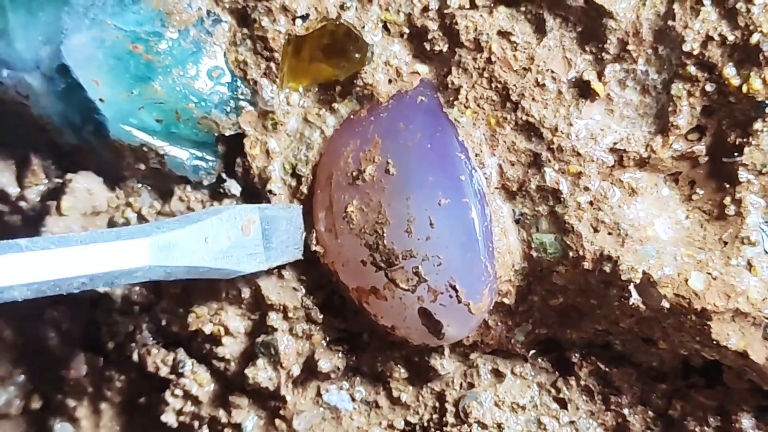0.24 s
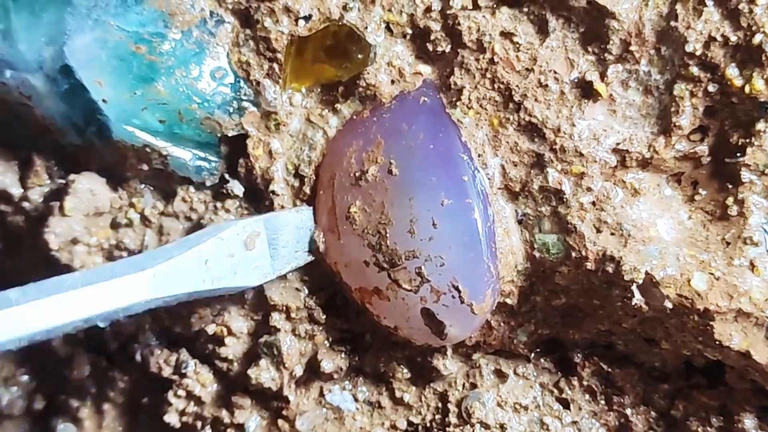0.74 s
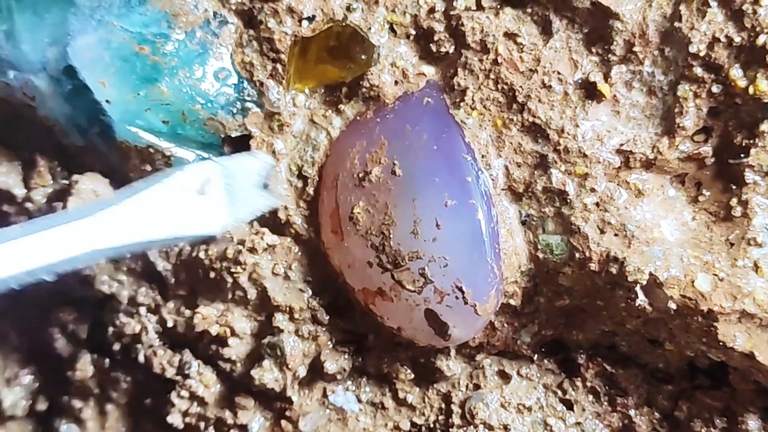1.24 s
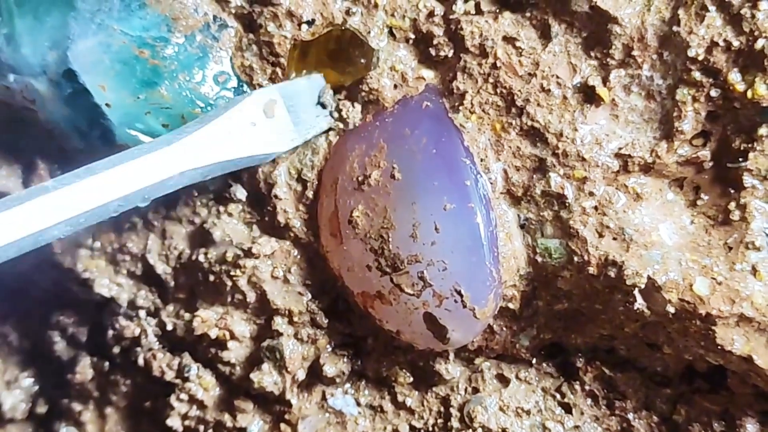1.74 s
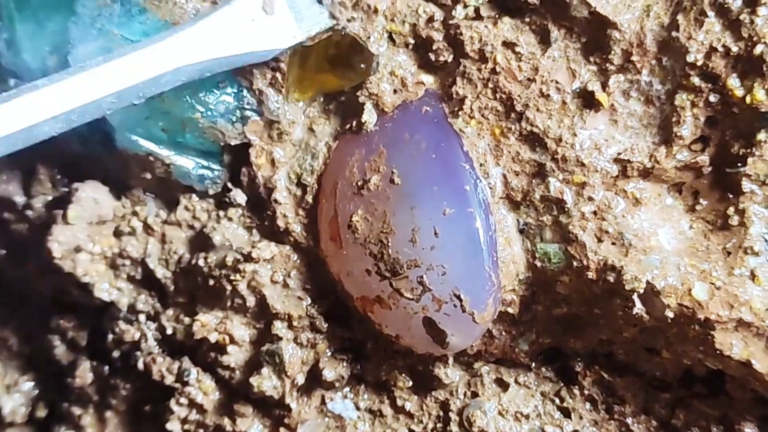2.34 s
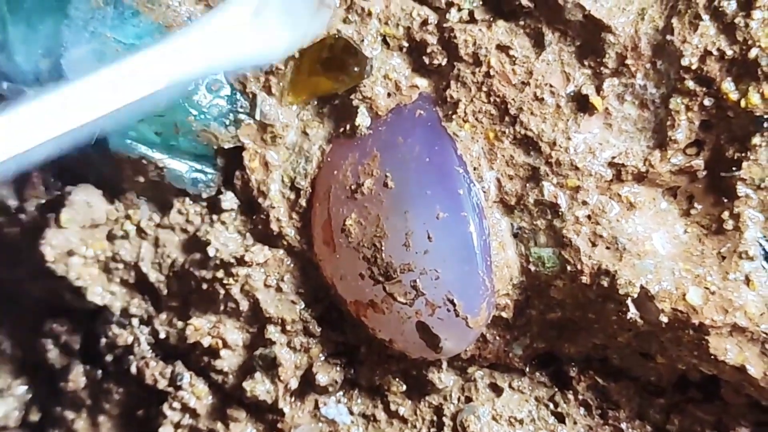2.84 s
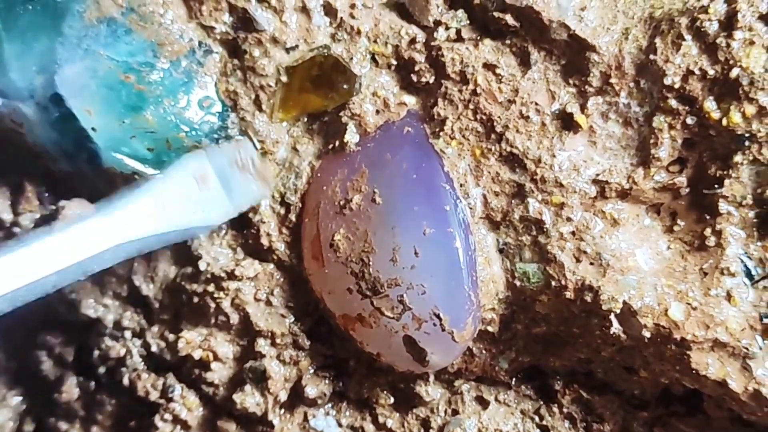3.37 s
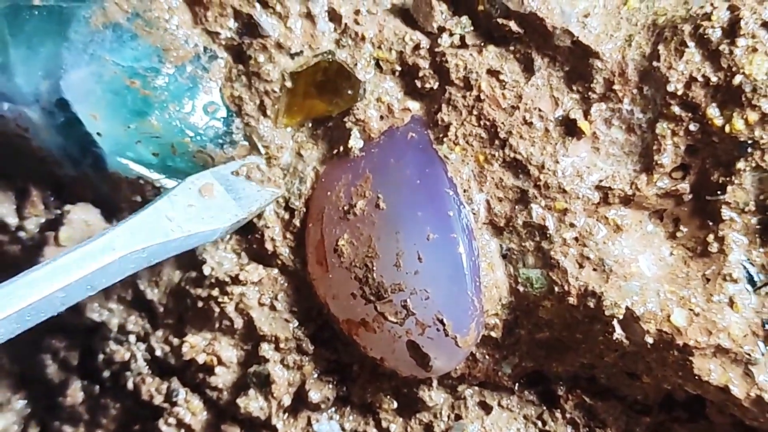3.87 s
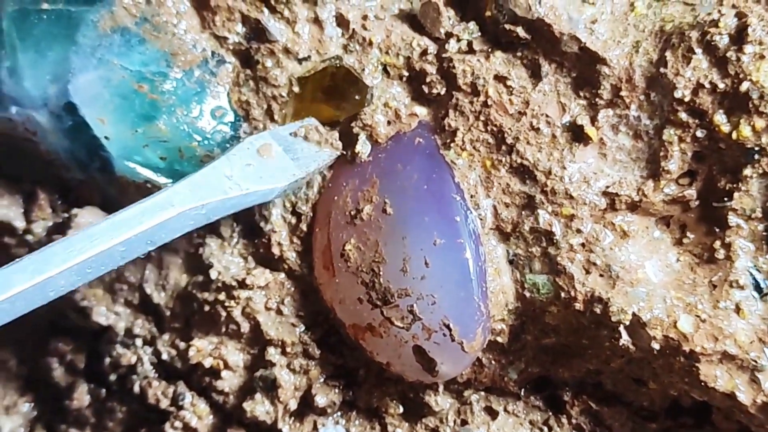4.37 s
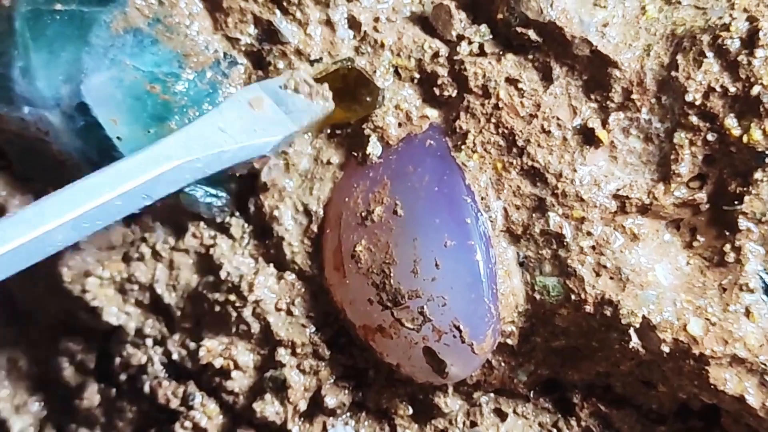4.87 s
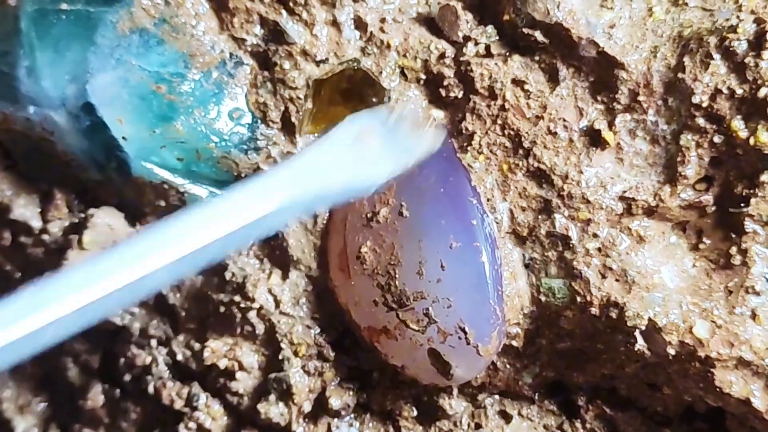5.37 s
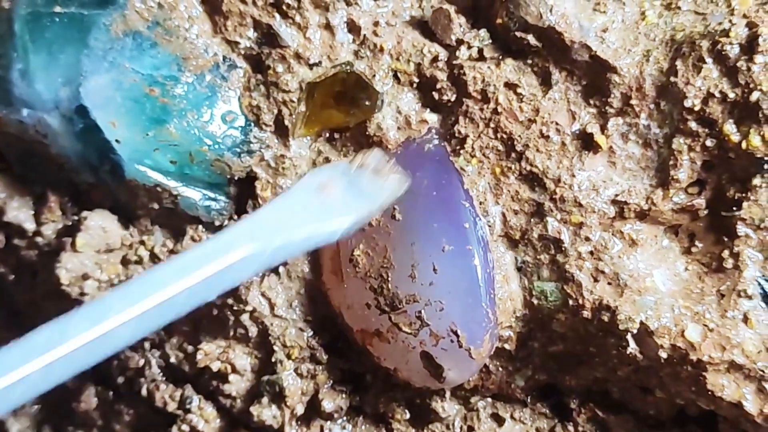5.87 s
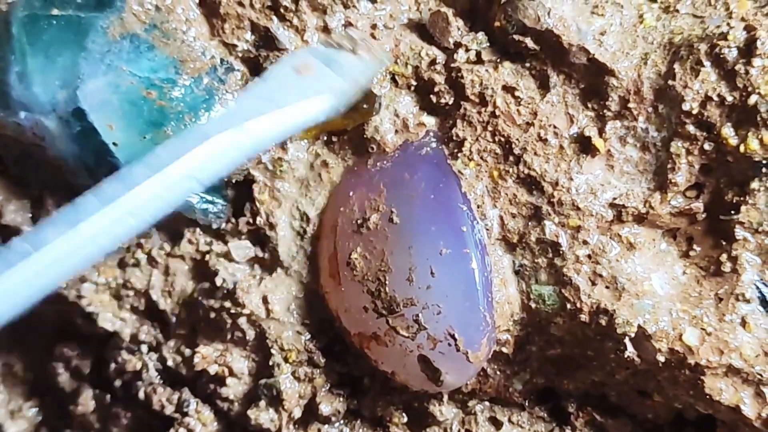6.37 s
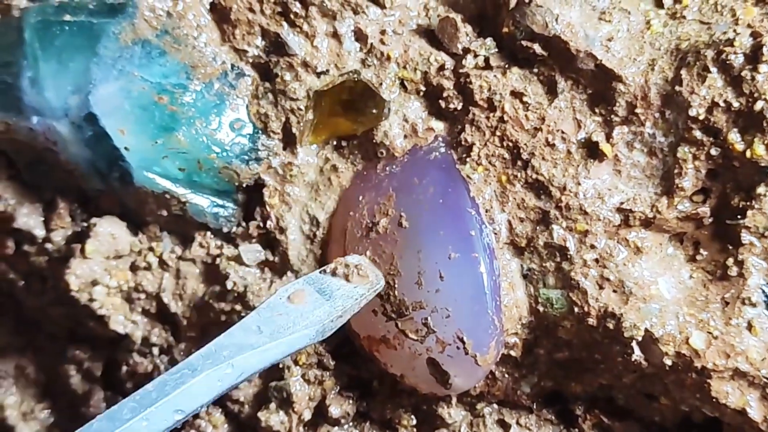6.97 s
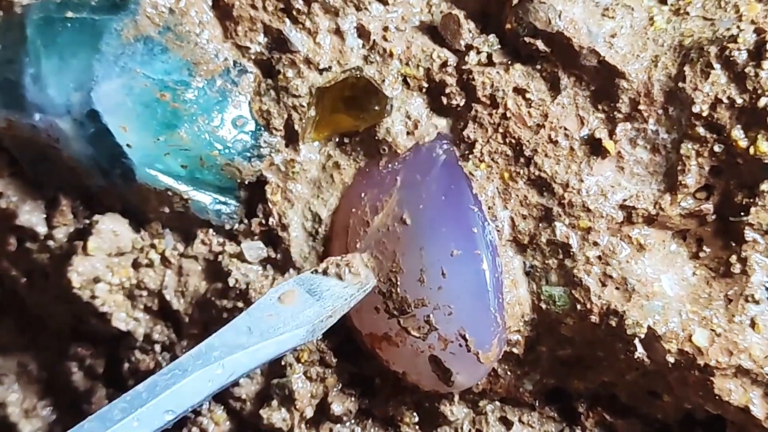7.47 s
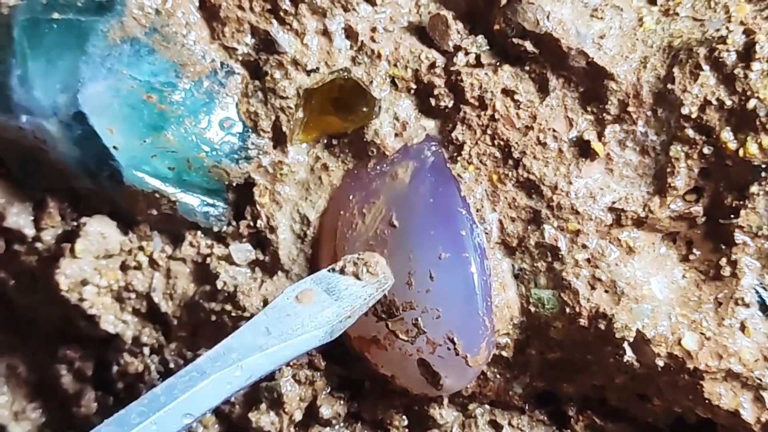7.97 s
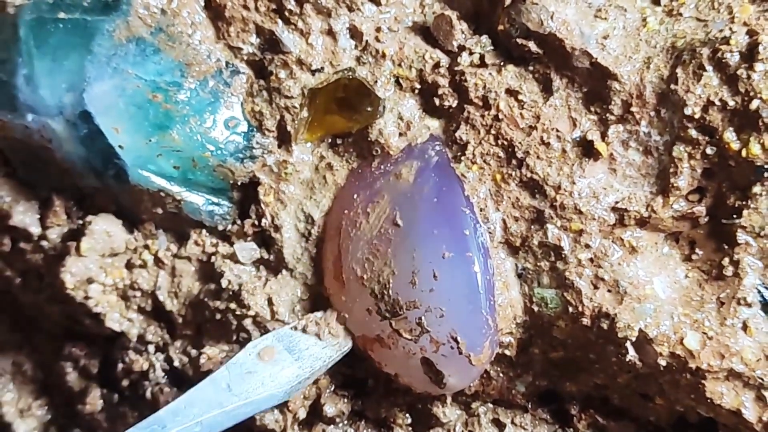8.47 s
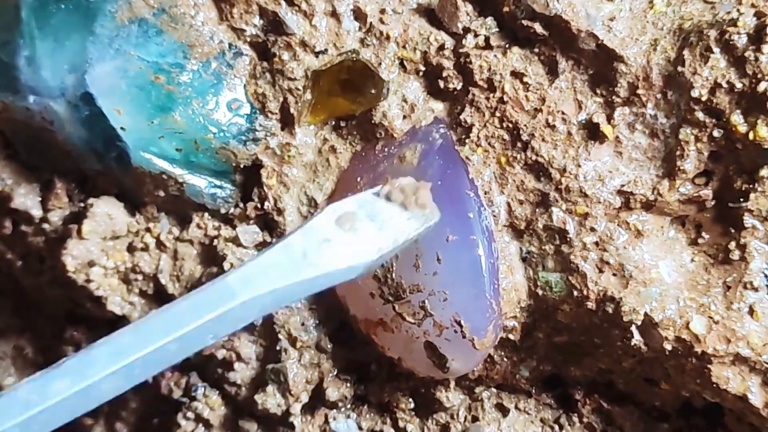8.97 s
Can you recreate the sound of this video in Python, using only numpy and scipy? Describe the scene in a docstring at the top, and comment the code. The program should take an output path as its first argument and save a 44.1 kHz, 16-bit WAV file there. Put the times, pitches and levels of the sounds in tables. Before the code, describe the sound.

A flat steel blade grinds under a stone in packed dirt, breaks it with a crunch, then taps, chips and scrapes while a cricket chirps faintly.

```python
"""Steel blade digging around a stone

Outdoors, a pair of microphones close to the ground, the left one nearer. A flat steel blade grinds in
under a stone set in packed dirt, then taps, chips off crumbs and scrapes through grit in short strokes:
shaped noise bursts and trains of tiny fractures. A tree cricket (falling tones) chirps twice a second over
a distant chorus and a faint rumble, both filtered noise; a far-off low drone fades in later."""
import sys
import numpy as np
from scipy import signal
from scipy.fft import rfft, irfft, next_fast_len
from scipy.io import wavfile
from scipy.ndimage import uniform_filter1d, map_coordinates

SR = 44100
rng = np.random.default_rng(int(sys.argv[2]) if len(sys.argv) > 2 else 0)


def int16_out(signal):
    """Quantize to a 16-bit WAV file."""
    q = np.round(np.clip(np.atleast_2d(signal).T, -1, 1) * 32767)
    wavfile.write(sys.argv[1], SR, q.astype(np.int16))


N = 406161

# strokes of the edge through grit, levels before the layers' own trims:
# [start t/s, hardest push t/s, end t/s, level at the hardest/dB, coarse knocks re that level/dB]
GRIT_STROKES = [(1.812, 1.832, 1.875, -42.5, 0.5), (1.92, 1.949, 1.986, -42, -7),
                (2.045, 2.084, 2.12, -47, -11), (2.142, 2.222, 2.3, -51, -1),
                (2.68, 2.724, 2.83, -28.5, -7), (3.111, 3.175, 3.272, -27.5, -8),
                (4.166, 4.196, 4.3, -51.5, -8.5), (4.596, 4.671, 4.72, -30, -9.5),
                (5.046, 5.062, 5.11, -27.5, -11), (5.222, 5.281, 5.335, -25.5, -11),
                (5.69, 5.769, 5.875, -33, -9), (6.167, 6.179, 6.24, -29.5, -13),
                (6.871, 6.945, 6.975, -42.5, -13), (7.24, 7.272, 7.3, -39, -6),
                (7.298, 7.318, 7.355, -38, 5.5), (7.358, 7.373, 7.4, -36, -10),
                (7.424, 7.449, 7.495, -34, -19.5), (7.849, 7.903, 7.925, -44.5, -5.5),
                (8.002, 8.076, 8, -43, -16), (8.305, 8.352, 8.45, -39.5, -17.5),
                (8.875, 8.935, 8.99, -38.5, -7.5), (9.125, 9.2, 9.6, -41.5, -7.5)]
# clods that shift with a dull thud: [t/s, peak level before a common trim/dB, hollow pitch f/Hz]
CLOD_THUDS = [(0.601, -15, 1110), (.65, -8.5, 780), (0.683, -10, 830), (1.414, -37.5, 422),
              (1.66, -30, 700), (1.682, -30.5, 504), (2.133, -26.5, 565), (3.49, -33.5, 394),
              (5.002, -26.5, 600), (6.164, -27.5, 339.9), (7.319, -21, 700), (7.52, -41, 310.3),
              (8.418, -40.5, 335.5)]
# the steel tip clicks on hard ground: [t/s, level/dB, brightness/dB]
STEEL_TAPS = [(.6505, -16, -10), (0.7673, -43.5, -1), (.8235, -38, -14), (.841, -34.5, -10.5),
              (1.4034, -41, 2.5), (1.516, -42, -4.5), (2.1351, -31, -7.5), (2.4424, -23.5, -11),
              (2.7085, -17.5, 9.5), (3.0053, -24, -0.5), (3.3377, -36, -11), (3.4895, -30.5, 2),
              (3.8572, -51, 6), (4.036, -51, 6), (4.159, -37.5, -8.5), (4.4719, -32, -7),
              (4.5897, -26, -6.5), (4.9972, -28, -4), (5.2207, -26.5, 4), (5.5463, -29.5, 4),
              (5.6041, -42.5, 6), (5.7373, -27, -7.5), (6.0283, -29, -0.5), (6.1635, -18, 5),
              (6.6954, -43.5, -5.5), (7.233, -39, -2), (7.993, -28.5, -6), (8.565, -42.5, -9),
              (8.722, -39, -10), (9.1176, -25, -4.5), (9.2033, -16.5, -4.5)]
# crumbs of dirt crack off: [t/s, level/dB, brightness/dB]
CRUMB_CRACKS = [(.5387, -35, -6), (.5492, -34, -13), (.5724, -39, -9), (.6028, -35.5, -11), (.685, -30, -1),
                (1.0654, -37.5, -3), (1.0763, -29, 4), (1.4138, -37, 3), (1.5342, -45, -1),
                (1.6625, -39, -9), (1.9033, -45.5, 7), (1.9411, -40, 2.5), (2.268, -40, -2),
                (2.494, -41, -2.5), (2.6987, -25.5, -3), (2.7157, -12, 7), (2.7379, -20.5, 10),
                (2.775, -27.5, 12.5), (2.843, -36.5, -5), (2.8704, -38, 0), (3.0605, -45.5, -5),
                (3.1138, -33.5, -4), (3.1547, -15.5, 10), (3.1676, -19, -2), (3.178, -17, 6),
                (3.2218, -26.5, 1), (4.6192, -27, 5), (4.6639, -27.5, 4), (4.6859, -18, 3),
                (5.0683, -17, 2), (5.191, -42.5, 8), (5.2541, -27, 11), (5.2651, -23.5, 14.5),
                (5.3097, -22.5, 4), (5.6885, -31.5, 11), (5.7503, -27.5, 8.5), (5.8221, -18.5, 4),
                (6.199, -30, -1.5), (6.3821, -36.5, 11), (7.3043, -34.5, -12), (7.3187, -28.5, -12),
                (7.3727, -33, -7), (7.482, -39, -1), (8.075, -44, -2), (8.4199, -43.5, 5),
                (8.9262, -22.5, 0.5)]
# drifting tempo of the near cricket: [t/s, chirps so far]
CRICKET_TEMPO = [(.05, 0), (.95, 2), (2.93, 6), (3.87, 8), (5.63, 12), (6.1, 13), (8.13, 17), (9.53, 20)]

# spectrum of a contact with packed dirt: [f/Hz, gain/dB]
DIRT_SPECTRUM = [(35, -36.5), (60, -12.5), (380, -5.5), (785, -10.5), (924, -4.5), (1250, 2.5), (1550, -4),
                 (2250, -3.5), (3580, -8), (5210, -3), (5590, 0), (6740, -8), (7570, -18), (13300, -19),
                 (16000, -31.5)]
# spectrum of the edge rasping through sand: [f/Hz, gain/dB]
RASP_SPECTRUM = [(600, -35), (1200, -5), (1550, -6.5), (2300, -3.5), (3500, -5), (4600, -6), (5500, -0.5),
                 (6600, -1.5), (7600, -16.5), (13000, -16), (16000, -21.5)]
# spectrum of coarse grains knocking on the blade: [f/Hz, gain/dB]
KNOCK_SPECTRUM = [(40, -21), (80, -7), (130, -1), (220, -7), (330, -0.5), (500, -4), (750, -6), (1150, -4),
                  (1600, -15), (3000, -50)]
# spectrum of the buried blade's hollow grind: [f/Hz, gain/dB]
GRIND_SPECTRUM = [(100, -21), (300, -13.5), (470, -6.5), (700, -8), (880, 2.5), (1100, 0), (1400, -1),
                  (1750, -9.5), (2150, -8), (3000, -25), (5000, -56)]
# spectrum of hissing dust and running sand: [f/Hz, gain/dB]
HISS_SPECTRUM = [(900, -31), (1500, -6.5), (2200, -9.5), (3600, -7.5), (5400, -12.5), (7500, -19),
                 (14000, -28.5), (16000, -33)]
# spectrum of the distant rumble and thin hiss: [f/Hz, gain/dB]
AIR_SPECTRUM = [(20, -6), (50, -5.5), (80, -2), (130, -5.5), (250, -12.5), (500, -14.5), (1100, -17),
                (2200, -21.5), (4000, -25.5), (6300, -26), (8000, -31.5), (16000, -31.5)]
# resonances of the blade on packed ground: [centre f/Hz, width f/Hz, boost/dB]
BLADE_RESONANCES = [(1300, 570, 0.5), (2310, 670, 4.5), (5000, 250, 0.5)]

# left-right likeness of the digging: [f/Hz, likeness 0..1]
DIGGING_LIKENESS = [(100, 0.77), (1200, 0.9), (2500, 0.46), (4000, 0.24), (6000, 0.06), (12000, 0.1)]
# left-right likeness of the distance: [f/Hz, likeness 0..1]
DISTANT_LIKENESS = [(30, 0.87), (130, .85), (500, .4), (2000, 0.28)]
# how much later the right microphone hears the blade: [f/Hz, delay t/s]
RIGHT_DELAY = [(300, 0.00028), (900, 0.00023), (1800, 0.000377)]
# time for the yard's scatter to fall by 60 dB: [f/Hz, t60 t/s]
YARD_DECAY = [(150, 0.38), (600, 0.096), (2500, 0.18), (6000, 0.145), (14000, 0.11)]

LEVEL_WINDOW_S = .007  # stretch of a contact over which its level is set
TOP_HZ = 16000  # band limit of the recorder
BUILD_DB, EASE_DB = 13, 15.5  # a stroke starts and ends this far below its hardest push
# the blade levers under the stone: it bites, forces its way in until the dirt breaks, comes free
BITE_S, BREAK_S, FREE_S = .19, 0.68, .74


def amp(db):
    """Decibels to linear amplitude."""
    return 10 ** (np.asarray(db) / 20)


def unit(x):
    """Scale to an rms of 1."""
    return x / np.sqrt(np.mean(x ** 2) + 1e-20)


def along(points, hz):
    """Read (Hz, value) points off a log frequency axis."""
    f, v = np.transpose(points)
    return np.interp(np.log(hz + 1), np.log(f + 1), v)


def wobble(rate, size):
    """A smooth random curve with this many knots a second."""
    knots = rng.standard_normal(int(size * rate / SR) + 4)
    fine = np.arange(0, len(knots) - 1, 1 / 4)
    curve = map_coordinates(knots, [fine])
    return np.interp(np.arange(size) * rate / SR, fine, curve)


def add(track, sound, s):
    """Mix a stereo sound into the track at time s."""
    i = max(round(s * SR), 0)
    track[:, i:i + sound.shape[1]] += sound[:, :max(N - i, 0)]


def noise(gain_db):
    """Two unrelated noises of joint rms 1 with the given spectrum."""
    m = next_fast_len(N, real=True)
    white = rfft(rng.standard_normal((2, m)))
    gain = amp(gain_db(np.fft.rfftfreq(m, 1 / SR)))
    return unit(irfft(white * gain, m)[:, :N])


def colour(x, gain_db):
    """Causal (minimum-phase) filter whose gain in dB is a function of frequency."""
    m = 2 * next_fast_len(x.shape[-1] // 2 + 256, real=True)
    cepstrum = irfft(np.log(amp(gain_db(np.fft.rfftfreq(m, 1 / SR))) + 1e-6))
    # fold the cepstrum so that nothing sounds before its cause
    cepstrum[1:m // 2] *= 2
    cepstrum[m // 2 + 1:] = 0
    return irfft(rfft(x, m) * np.exp(rfft(cepstrum)))[..., :x.shape[-1]]


def stereo(pair, alike, delayed=True):
    """Blend two unrelated signals into left and right; near sounds reach the left microphone first."""
    m = 2 * next_fast_len(pair.shape[1] // 2 + 128, real=True)
    hz = np.fft.rfftfreq(m, 1 / SR)
    turn = np.arccos(np.clip(along(alike, hz), -1, 1)) / 2
    mid, side = rfft(pair, m) * [np.cos(turn), np.sin(turn)]
    later = np.exp(-2j * np.pi * hz * along(RIGHT_DELAY, hz)) if delayed else 1
    return irfft([mid + side, (mid - side) * later])[:, :pair.shape[1]]


def body_db(hz):
    """Broad resonances of the blade on packed ground."""
    return sum(db / (1 + (2 * (hz - centre) / width) ** 2) for centre, width, db in BLADE_RESONANCES)


def grains(size, rate, spread_db, life, bed):
    """Tiny fractures (rate a second, life in s), random in time and size, on a bed of smooth friction."""
    sizes = amp(spread_db * np.minimum(rng.exponential(size=size), np.pi))
    breaks = (rng.random(size) < rate / SR) * sizes
    power = signal.lfilter([1], [1, -np.exp(-2 / (life * SR))], breaks ** 2)
    envelope = np.sqrt(power / (power.mean() + 1e-12) + abs(bed))
    return unit(envelope * rng.standard_normal((2, size)))


def shifting(x, depth_db):
    """Passing pebbles lend brief resonances of their own: patches of gain in time and frequency."""
    z = signal.stft(x, nperseg=256)[2]
    field = uniform_filter1d(rng.standard_normal(z.shape[1:]), 3, axis=0)
    field = uniform_filter1d(field, 5, axis=1)
    return signal.istft(z * amp(depth_db * unit(field)), nperseg=256)[1][:, :x.shape[1]]


def rub(times, levels_db, gain_db, source):
    """Play a grain source through a spectrum along a course of levels, for at least 20 ms."""
    t = np.arange(times[0], max(times[-1], times[0] + .02), 1 / SR)
    friction = shifting(source(len(t)), depth_db=3.5)
    sound = unit(stereo(colour(friction, gain_db), DIGGING_LIKENESS))
    return sound * amp(np.interp(t, times, levels_db)) * signal.windows.tukey(len(t), .06)


def snap(give, spike, bright_db, decay=0.0028, settle_db=-22, settle=0.014, crush_db=-4,
         crackle_db=3.5, spot_db=1.5, knock_db=-2, heavy=0.25):
    """One contact, centred on its middle: dirt crackles while it gives way, snaps, and its pieces settle."""
    t = np.arange(-SR // 20, SR // 20) / SR
    before = amp(crush_db) * np.exp(-abs(t) / give)
    after = np.exp(-abs(t) / decay) + amp(settle_db) * np.exp(-abs(t) / settle)
    envelope = np.where(t < 0, before, after)
    crackle = amp(crackle_db * wobble(621.1, len(t)))
    burst = envelope * rng.standard_normal((2, len(t))) * crackle
    burst[0, len(t) // 2] += spike
    # dull contacts are heavier in the bass, and each spot of ground favours its own bands
    low, ring, grit = spot_db * rng.standard_normal(size=3)
    spot = [(200, low - heavy * bright_db), (1150, knock_db + low), (1700, 0.00039), (3200, 0.0013),
            (4500, 0.65 * bright_db + ring), (6800, 0.92 * bright_db + ring), (8500, bright_db + grit)]
    spectrum = lambda hz: along(DIRT_SPECTRUM, hz) + body_db(hz) + along(spot, hz)
    sound = stereo(colour(burst, spectrum), DIGGING_LIKENESS)
    loud = abs(t - LEVEL_WINDOW_S / 4) < LEVEL_WINDOW_S / 2
    return sound / np.sqrt(np.mean(sound[:, loud] ** 2))


def contacts(rows, give, spike):
    """Centre a snap on each (t/s, level/dB, brightness/dB)."""
    out = np.zeros((2, N))
    for s, db, bright_db in rows:
        sound = snap(give, spike, bright_db)
        add(out, amp(db) * sound, s - sound.shape[1] / 2 / SR)
    return out


def pressure(db):
    """Level of a stroke at its start, its hardest push and its end."""
    return [db - BUILD_DB, db, db - EASE_DB]


def air(level_db=-63):
    """Distant outdoor rumble and a thin hiss: noise whose level wavers slightly."""
    rumble = stereo(noise(lambda hz: along(AIR_SPECTRUM, hz)), DISTANT_LIKENESS, delayed=False)
    return amp(level_db + .8 * wobble(8.4, N)) * unit(rumble)


def crickets(pitch_hz=2935, pulse_hz=59, droop_hz=130, blur=1.16, width_hz=180, duty=.56,
             near_db=-63.0, chorus_db=-69):
    """Each wing stroke is a short falling tone; echoes and farther crickets blur into a narrow band."""
    strokes = np.cumsum(pulse_hz + 2.5 * wobble(6.0, N)) / SR % 1  # phase within a wing stroke
    hz = pitch_hz + droop_hz * (.5 - strokes) + 18 * wobble(40, N)
    tone = np.sin(2 * np.pi * np.cumsum(hz) / SR)
    trill = unit(np.sin(np.pi * strokes) ** 2 * tone)
    band = noise(lambda f: -10 * np.log10(1 + (2 * abs(f - pitch_hz) / width_hz) ** 6))
    # a chirp swells around every whole beat
    beat = np.interp(np.arange(N) / SR, *np.transpose(CRICKET_TEMPO))
    swell = np.maximum(1 - (2 * (beat - beat.round()) / duty) ** 2, 0)
    near = swell * unit(trill + blur * band) * amp([[-2.5], [1.5]])  # louder on the right
    return amp(near_db) * near + amp(chorus_db) * band


def crumbs(level_db=-72):
    """Loosened crumbs tick faintly as they fall: sparse grains, softened in the treble."""
    ticks = grains(N, rate=13, spread_db=3.0, life=0.0036, bed=0)
    return amp(level_db) * unit(signal.lfilter([1], [1, -.7], ticks))


def wedge(grind_db=-45.0, strain_db=-32, strain=.1, hiss_db=-37.5, swell_db_per_s=43, attack=.04,
          touch=.13, quiet_db=-57):
    """Buried, the blade grinds hollowly in small slips under a swelling hiss, straining before the break."""
    out = np.zeros((2, N))
    slips = lambda size: grains(size, rate=140, spread_db=2.5, life=.003, bed=.7)
    dust = lambda size: grains(size, rate=110, spread_db=8.5, life=0.0012, bed=2.24)
    times = [BITE_S - touch, BITE_S - attack, BITE_S, BREAK_S - strain, BREAK_S, FREE_S]
    grinding = [quiet_db, quiet_db, grind_db, grind_db, strain_db, quiet_db]
    hissing = [hiss_db - swell_db_per_s * (BREAK_S - s) for s in times[:-1]] + [quiet_db]
    add(out, rub(times, grinding, lambda hz: along(GRIND_SPECTRUM, hz), slips), times[0])
    add(out, rub(times, hissing, lambda hz: along(HISS_SPECTRUM, hz), dust), times[0])
    return out


def chipping():
    """A tap starts at once with a sharp spike; a crumb gives way slowly before it cracks."""
    taps = contacts(STEEL_TAPS, give=.00016, spike=3.4)
    cracks = contacts(CRUMB_CRACKS, give=0.0024, spike=.3)
    return taps + cracks + shank()


def thuds(level_db=-2, decay=0.011, width=0.49, skirt=3):
    """A loosened clod rocks in its hollow: a dull, quickly damped band of noise."""
    out, t = np.zeros((2, N)), np.arange(SR // 10) / SR
    for s, db, pitch_hz in CLOD_THUDS:
        hollow = lambda hz: -10 * np.log10(1 + (2 * abs(hz - pitch_hz) / (width * pitch_hz)) ** skirt)
        burst = np.exp(-t / decay) * rng.standard_normal((2, len(t)))
        thud = stereo(colour(burst, hollow), DIGGING_LIKENESS)
        add(out, amp(db + level_db) * thud / abs(thud).max(), s)
    return out


def shank(pitch_hz=2330, width_hz=380, decay=.006, level_db=-7.0):
    """Every tap leaves the steel ringing briefly, damped by the hand: a decaying band of noise."""
    out, t = np.zeros((2, N)), np.arange(SR // 10) / SR
    steel = lambda hz: -10 * np.log10(1 + (2 * abs(hz - pitch_hz) / width_hz) ** 4)
    for s, db, _ in STEEL_TAPS:
        ring = colour(rng.standard_normal((2, len(t))), steel)
        ring = unit(stereo(ring, DIGGING_LIKENESS)) * np.exp(-t / decay)
        add(out, amp(db + level_db) * ring, s)
    return out


def trickle(level_db=-57, fade_db_per_s=33, length=0.71):
    """After the break, loosened sand runs off and dies away."""
    sand = lambda size: grains(size, rate=90, spread_db=5, life=0.0018, bed=1.5)
    out = np.zeros((2, N))
    levels = [level_db, level_db - fade_db_per_s * length]
    running = rub([FREE_S, FREE_S + length], levels, lambda hz: along(HISS_SPECTRUM, hz), sand)
    add(out, running, FREE_S)
    return out


def scrapes(rasp_db=-1.1, knock_db=0.0, fine_db=6, clearing_db_per_s=0.97, bared_per_s=.11):
    """The edge drags through sand, duller and more resonant as it is cleared; coarse grains knock."""
    out = np.zeros((2, N))
    sand = lambda size: grains(size, rate=600, spread_db=3.8, life=.0011, bed=.25)
    gravel = lambda size: grains(size, rate=200, spread_db=2.5, life=0.0039, bed=0.28)
    knock = lambda hz: along(KNOCK_SPECTRUM, hz)
    for *times, db, coarse_db in GRIT_STROKES:
        # treble of the loose sand still left
        fine = [(6500, 0.00087), (8000, fine_db - clearing_db_per_s * times[0])]
        bared = bared_per_s * times[0]
        rasp = lambda hz: along(RASP_SPECTRUM, hz) + body_db(hz) * bared + along(fine, hz)
        add(out, amp(rasp_db) * rub(times, pressure(db), rasp, sand), times[0])
        add(out, amp(knock_db + coarse_db) * rub(times, pressure(db), knock, gravel), times[0])
    return out


def crunches(over_db=0.0, scatter_db=2.0, bright_db=1):
    """The edge catches on small crumbs at uneven intervals; more pressure cracks them louder."""
    spacing = .028  # s, one crumb at a random moment in each slot
    rows = []
    for *times, db, _ in GRIT_STROKES:
        for slot in np.arange(times[0], times[-1] - spacing / 2, spacing):
            s = slot + spacing * rng.random()
            push_db = np.interp(s, times, pressure(db))
            rows.append((s, push_db + over_db + scatter_db * rng.standard_normal(), bright_db))
    return contacts(rows, give=0.00076, spike=1)


def drone(level_db=-67, centre_hz=165, width_hz=130, start=3.87, rise=1.41):
    """A far-off low drone, perhaps traffic, fades in and stays: a band of noise."""
    band = noise(lambda hz: -10 * np.log10(1 + (2 * abs(hz - centre_hz) / width_hz) ** 4))
    fade = np.clip((np.arange(N) / SR - start) / rise, 0, 1)
    return amp(level_db) * fade * unit(stereo(band, DISTANT_LIKENESS, delayed=False))


def yard(x):
    """Weak scatter from the surroundings, 5 ms late, each frequency dying at its own speed."""
    hz, t, z = signal.stft(rng.standard_normal((2, SR // 2)), SR, nperseg=256)
    dying = amp(-60 * t / along(YARD_DECAY, hz)[:, None])
    tail = signal.istft(z * dying, SR, nperseg=256)[1]
    tail = np.pad(tail / np.linalg.norm(tail[0]), ((0, 0), (SR // 200, 0)))
    return signal.fftconvolve(x, tail, axes=1)[:, :N]


def scene():
    """The digging close by, its scatter from the yard, and the outdoors behind it."""
    digging = crumbs() + wedge() + chipping() + thuds() + trickle() + scrapes() + crunches()
    return digging + amp(-13.5) * yard(digging) + air() + crickets() + drone()


def record(dry):
    """The recorder keeps nothing above its band limit."""
    m = next_fast_len(N + SR // 2)
    kept = np.fft.rfftfreq(m, 1 / SR) < TOP_HZ
    return irfft(rfft(dry, m) * kept, m)[:, :N]


dry = scene()
out = record(dry)
int16_out(out)
```